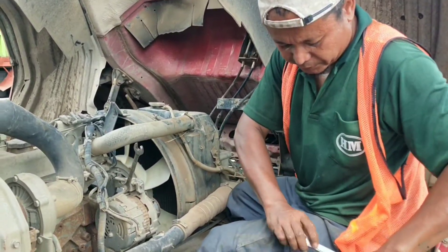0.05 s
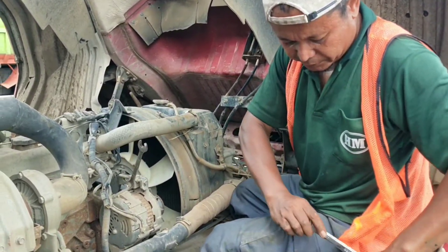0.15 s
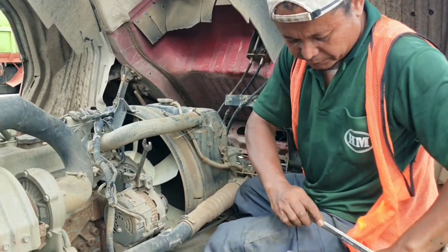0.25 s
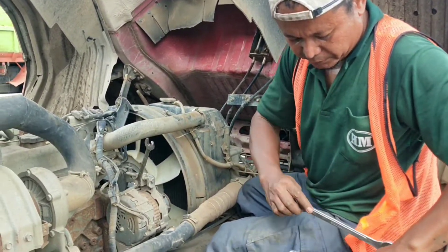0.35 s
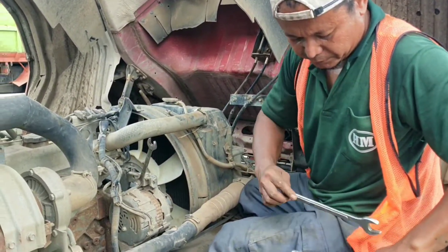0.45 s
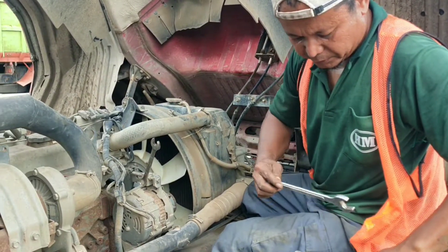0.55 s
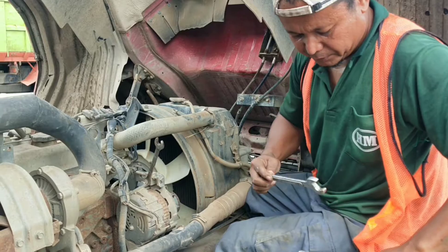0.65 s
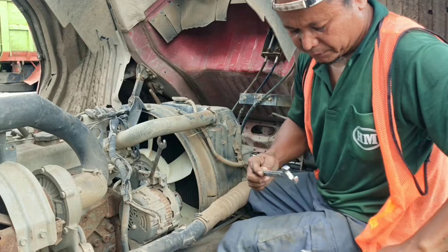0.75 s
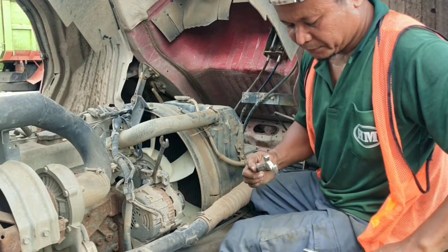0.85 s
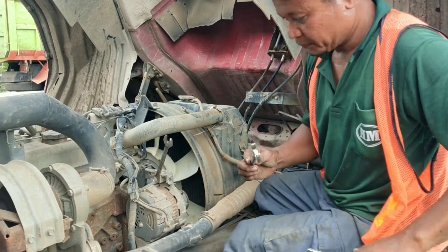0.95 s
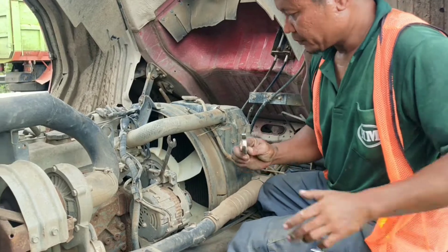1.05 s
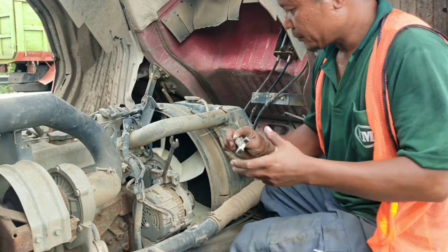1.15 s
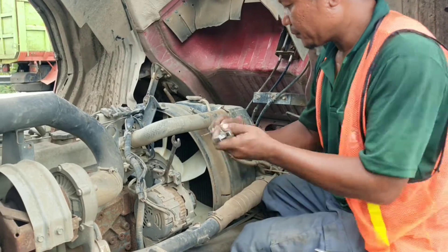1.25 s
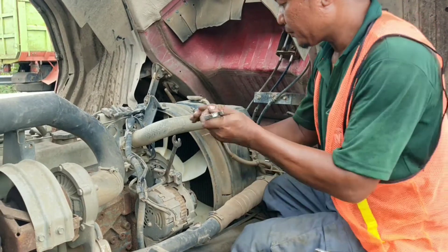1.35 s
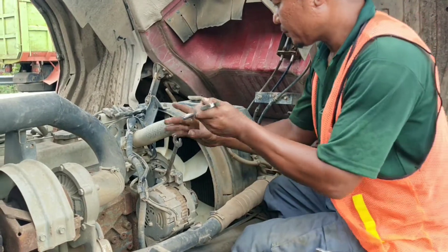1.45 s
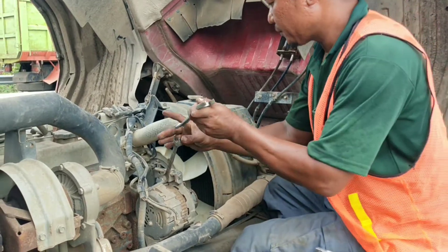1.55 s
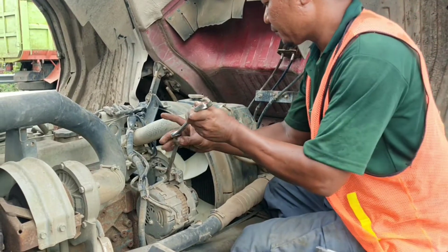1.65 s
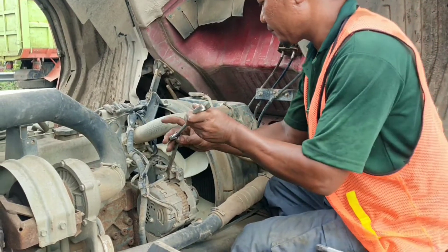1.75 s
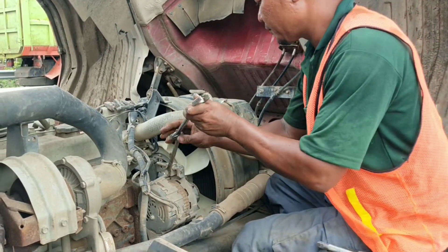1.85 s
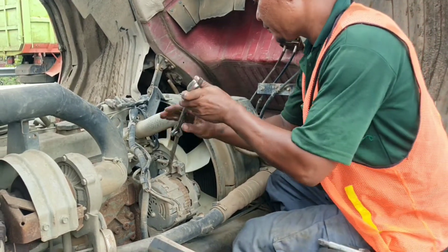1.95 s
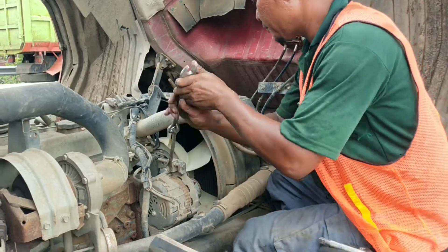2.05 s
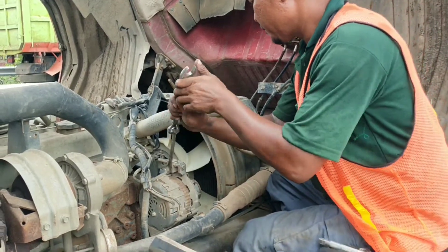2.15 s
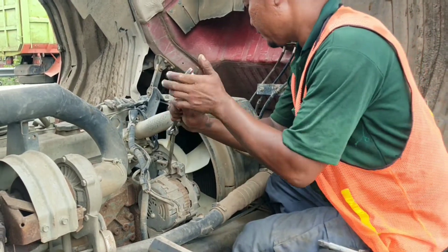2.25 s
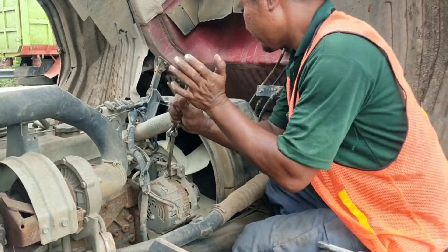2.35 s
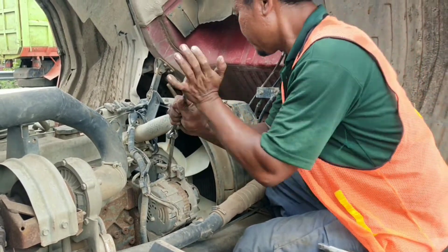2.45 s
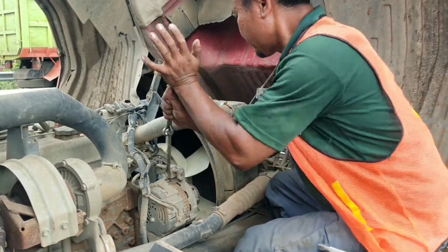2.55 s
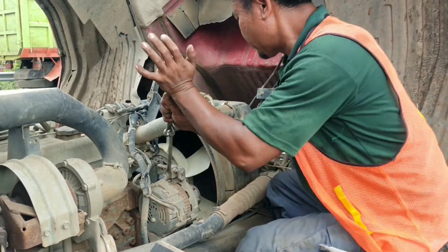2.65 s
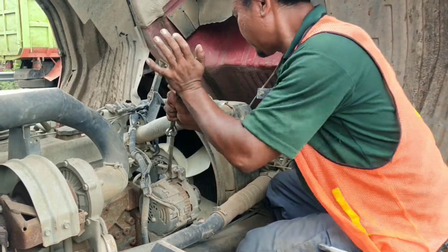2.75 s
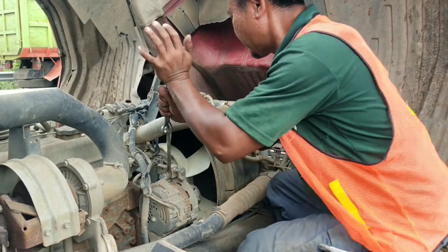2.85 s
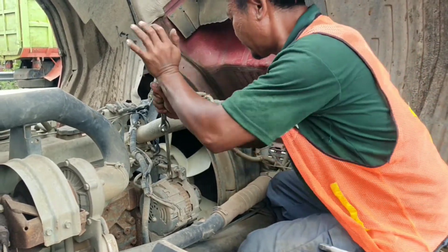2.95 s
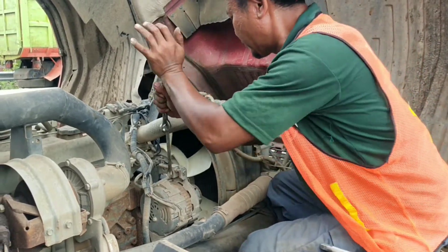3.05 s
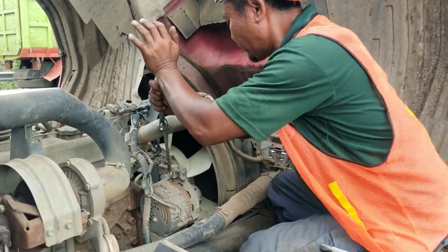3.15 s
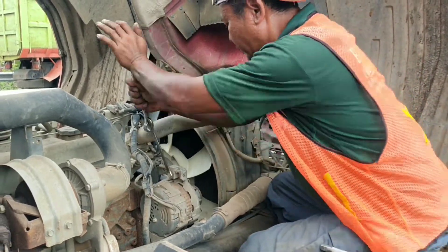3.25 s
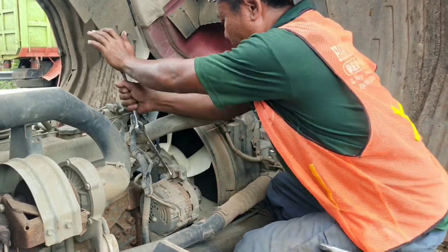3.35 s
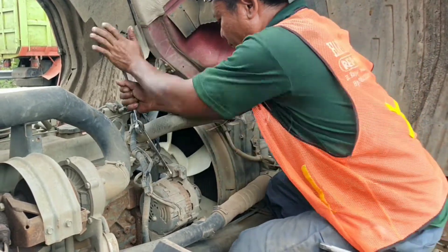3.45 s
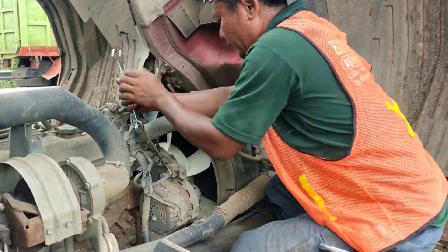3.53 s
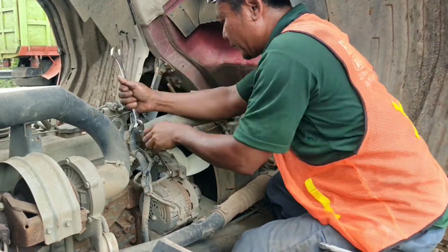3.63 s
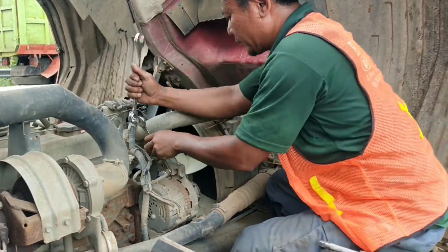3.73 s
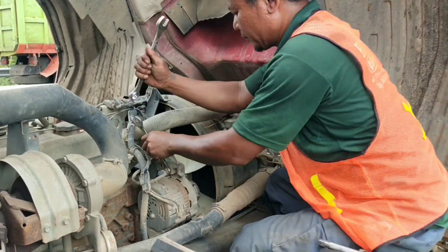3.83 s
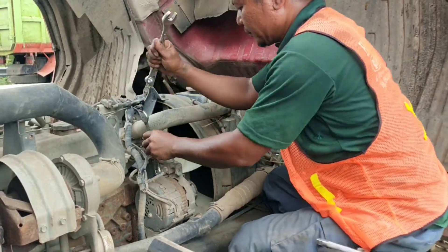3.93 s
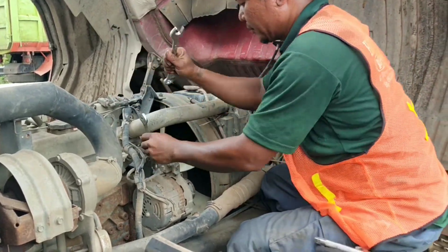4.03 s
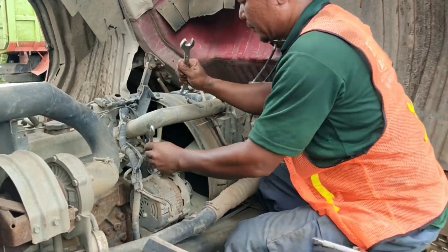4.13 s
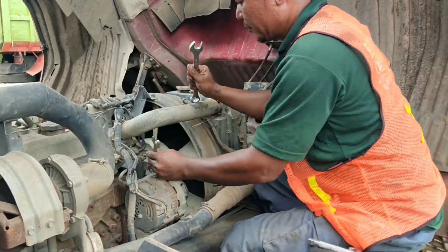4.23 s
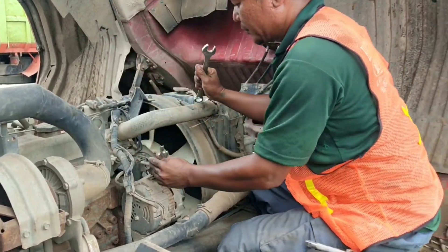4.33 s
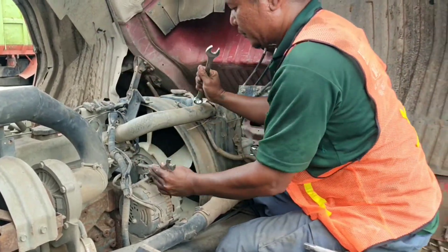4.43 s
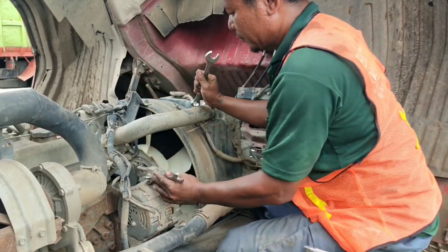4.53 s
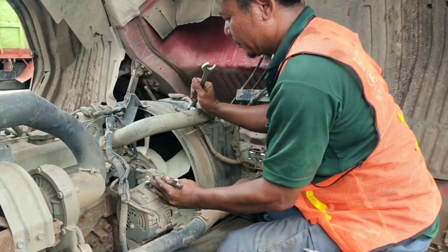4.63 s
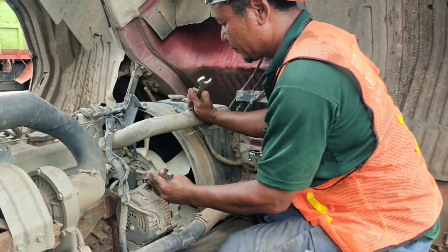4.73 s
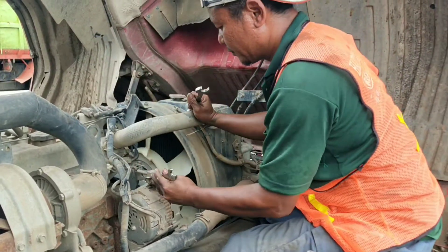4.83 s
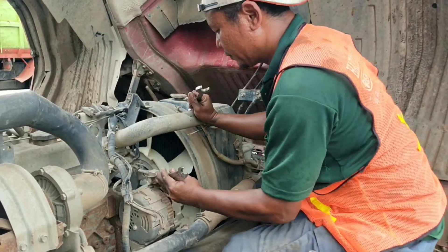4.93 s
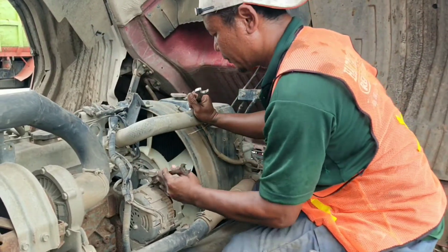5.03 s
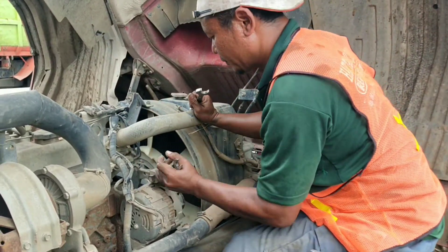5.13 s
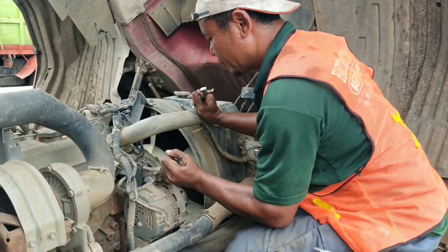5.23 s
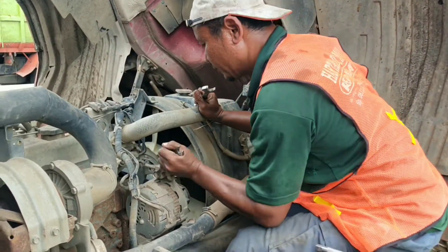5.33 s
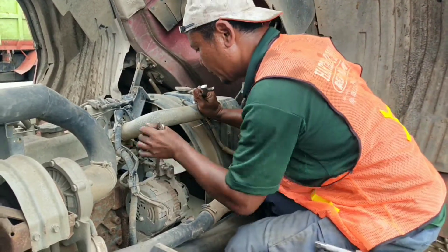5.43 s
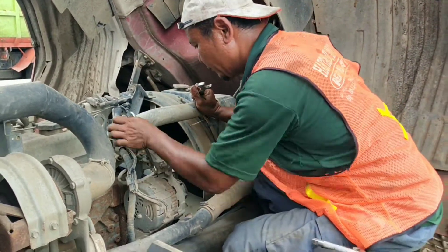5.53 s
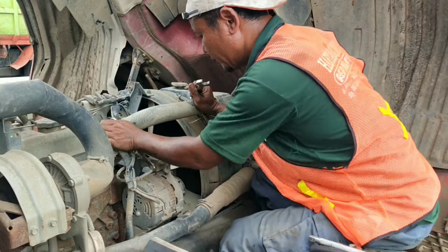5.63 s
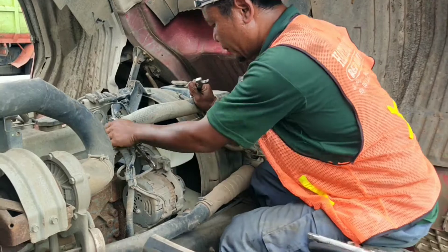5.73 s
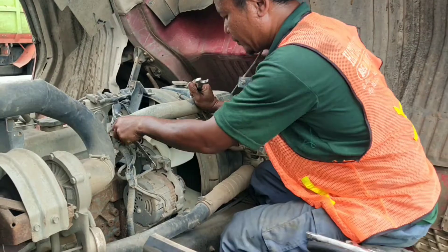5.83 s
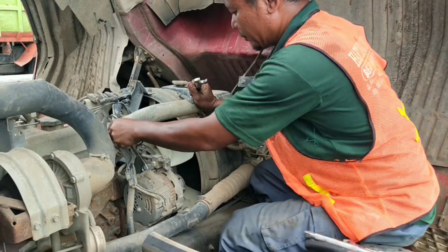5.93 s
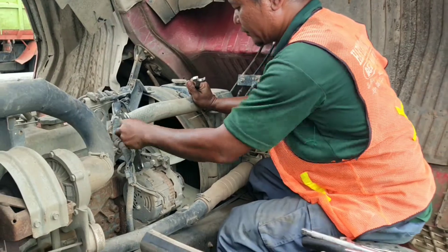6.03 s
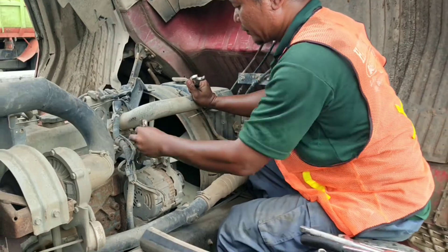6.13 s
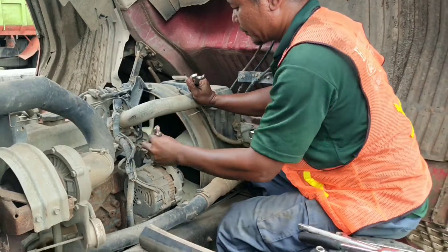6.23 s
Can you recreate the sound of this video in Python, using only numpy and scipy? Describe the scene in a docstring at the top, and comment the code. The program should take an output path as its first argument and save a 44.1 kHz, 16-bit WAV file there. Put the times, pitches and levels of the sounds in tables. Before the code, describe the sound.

Low rumble and a dull rush of far machinery run throughout, with a quiet engine note that repeatedly surges and sags, a soft hum and a thin wavering whine. At 0.5 s a faint tap and slight sliding rustle; at 0.8 s a spanner clinks brightly. A softer, longer clink rings from 1.36 s, with a dull tap at 1.6. Between 2.3 and 2.75 s come a tap and a flurry of small clicks and knocks as the jaw seats. A firm knock lands at 3.2 s, then at 3.56 s the loudest event, a hard steel crack with a short mount boom and cab echo. A faint pipe scrape spans 4.3-4.9 s, with a tap at 4.73. A strong click-knock hits at 5.46 s, another at 5.55, then soft taps and finger rasps fade by 6.2 s.

```python
"""Spanners on an engine bolt

A mechanic picks up two steel spanners, seats one on a bolt and strikes it with his palm until it cracks loose.
Clicks and block knocks are impact chatter through resonances; clinks and mount thuds are damped sines.
Taps are damped pushes; finger rasp, thread hiss and a scraped pipe are noise with uneven slips.
The tilted cab answers with decaying noise. Far machinery rumbles and rushes as noise, drones, hums and
whines as sines."""
import sys
import numpy as np
from scipy import signal
from scipy.fft import rfft, irfft, next_fast_len
from scipy.io import wavfile
from scipy.ndimage import map_coordinates

SR = 44100
rng = np.random.default_rng(int(sys.argv[2]) if len(sys.argv) > 2 else 0)


def digitize_waveform(pressure):
    """Quantize a signal to 16-bit integers and store it at the path in sys.argv[1].

    Rows of a 2-D input are taken as channels; values are limited to [-1, 1].
    """
    field = np.atleast_2d(pressure).T
    bounded = np.clip(field, -1, 1)
    quanta = np.round(bounded * 32767).astype(np.int16)
    wavfile.write(sys.argv[1], SR, quanta)


N = 276948

# Steel against bolt. Each row: start in seconds, click in dB, block knock in dB, chatter t60 in seconds.
BLOWS = [(0.799, -47.5, -59, 0.037), (1.3547, -59.5, -75, 0.056), (2.3343, -60, -51.5, 0.13),
         (2.3755, -60, -57, 0.11), (2.4372, -46, -42.5, 0.02), (2.502, -64, -53, 0.055),
         (2.635, -51, -47, 0.065), (2.733, -46.5, -52.5, 0.044), (3.195, -31, -29.5, 0.053),
         (3.4845, -63, -80.5, .098), (3.5566, -16, -24, 0.032), (4.3708, -63, -59.5, 0.089),
         (4.4077, -61, -48, 0.19), (4.922, -44, -51, 0.063), (5.4553, -37, -29.5, 0.036),
         (5.549, -52.5, -35.5, 0.025), (5.638, -57.5, -46, 0.04), (6.1845, -61.5, -73, 0.021)]
# Light touches of a loose jaw just before it bites. Each entry: start in seconds.
TOUCH_STARTS_S = [2.425, 2.616, 2.722, 3.182]
TOUCH_CLICK_DB, TOUCH_KNOCK_DB, TOUCH_CHATTER_S = -52.5, -52, 0.06
# Resonances of the jaw. Each row: centre in Hz, width in Hz, level in dB.
JAW_MODES = [(2860, 380, 0), (4000, 290, -4), (4384, 300, -8.5), (5640, 730, 4), (5800, 1100, -2.5),
             (11190, 290, -19), (14600, 640, -17.5)]
# Resonances of the engine block. Each row: centre in Hz, width in Hz, level in dB.
BLOCK_MODES = [(453, 45, -18.5), (661, 15, -3), (1017.5, 110, -4), (1290, 74, -0.5), (1550, 390, -6.5),
               (2144, 79, 8), (2656, 95, -7.5), (2800, 43, -6.5)]
# Spectrum of the jaw click. Each row: frequency in Hz, density in dB per Hz.
CLICK_SPECTRUM = [(800, -27.5), (2000, 9.5), (3500, -4.5), (5800, -1.5), (7500, -10.5), (10000, -20),
                  (15000, -21)]
# Spectrum of the block knock. Each row: frequency in Hz, density in dB per Hz.
KNOCK_SPECTRUM = [(60, -12), (160, -10), (350, -7.5), (700, 1), (1600, 2), (2600, -4.5), (4000, -24),
                  (8000, -48)]

# Heavy blows shake the bolt's mounting. Each row: start in seconds, level in dB.
THUDS = [(3.5572, -36.5), (5.4554, -36), (5.5506, -44.5)]
# Modes of the mounting. Each row: frequency in Hz, level in dB, t60 in seconds.
MOUNT_MODES = [(166, -7.5, 0.28), (227.4, -14, 1.7), (307, -3, 0.17), (350, -9.5, 0.69), (401.7, 0.5, 0.2),
               (459, 8, 0.053), (668, 2.5, 0.18), (758, -2, 0.24)]

# Free ringing of the tools. Each row: start in seconds, level in dB, which spanner, rise time constant
# in seconds, time until the hand stops it in seconds.
CLINKS = [(.15, -91.5, "short", 0.022, .4), (0.802, -53, "long", 0.00086, 0.27),
          (1.3557, -48, "short", 0.01, 0.87), (2.331, -61, "seated", 0.005, 0.047),
          (2.376, -53, "seated", 0.0021, 0.13), (2.4373, -45.5, "seated", 0.0014, 0.076),
          (3.4835, -53, "gripped", .002, 0.089), (4.404, -60, "seated", 0.0061, .06)]
# Long spanner, held loosely. Each row: frequency in Hz, level in dB, t60 in seconds.
LONG_MODES = [(1949, -17, .4), (3252, 0, .42), (3978, -3, .15), (5803, -7, .45), (6078, -11, .4),
              (8979, -22, .45), (12660, -20, .55), (13460, -21, .55), (14980, -17, .65)]
# Short spanner, held loosely. Each row: frequency in Hz, level in dB, t60 in seconds.
SHORT_MODES = [(2340, -21, 0.94), (2724, -27, 2.63), (4916, 6, 0.62), (6360, -28, 9.2), (8393, -10, 0.45),
               (10050, -26.5, 0.59), (12600, -34, .4), (14030, -34, 1.1)]
# Spanner seated on the bolt. Each row: frequency in Hz, level in dB, t60 in seconds.
SEATED_MODES = [(2540, 8.5, 0.13), (4400, 0, 0.084), (5070, -6, 0.1), (5590, -10.5, 0.07),
                (6650, 1.5, 0.065), (7960, -25, .15), (12860, -26, 0.16), (15500, -29, 0.13)]
# Spanner gripped in the fist. Each row: frequency in Hz, level in dB, t60 in seconds.
GRIPPED_MODES = [(2010, 1, 0.023), (2690, -2, 0.055), (4060, -11.5, 0.12), (4340, -8.5, 0.029),
                 (4980, -6, .08), (6147, -4, 0.24), (6705, -11, 0.02), (10700, -27, .08),
                 (10500, -26.5, .08), (14490, -18, 0.063)]
HAND_PORT_DB = 4  # a held spanner is nearer the left port: left raised, right lowered by this

# Dull taps of hand and tool. Each row: start in seconds, level in dB, centre in Hz.
TAPS = [(.497, -54.5, 700), (1.156, -49.5, 602.8), (1.339, -57, 680), (1.621, -42.5, 493),
        (1.672, -56.5, 685), (2.342, -40.5, 950), (4.729, -38.5, 850), (5.442, -35.5, 486.7),
        (5.698, -39.5, 380), (5.728, -44.5, 700), (5.751, -50, 810), (6.013, -54.5, 806)]

# Finger strokes at the bolt. Each row: start in seconds, length in seconds, skin rasp in dB, thread hiss in dB.
STROKES = [(0.576, 0.24, -76, -90), (0.818, .11, -64, -79.5), (2.947, .07, -74.5, -97.5),
           (3.819, .06, -76.5, -100), (5.068, 0.049, -64, -85), (5.164, 0.066, -60.5, -84),
           (5.248, 0.079, -82, -84), (5.409, 0.037, -48, -66.5), (5.561, 0.21, -66.5, -87.5),
           (5.796, 0.099, -63.5, -101), (5.901, 0.099, -78.5, -85), (6.008, 0.082, -64, -71),
           (6.101, 0.14, -65, -78)]
STROKE_ATTACK_S, STROKE_RELEASE_S = .02, 0.024
# Spectrum of the skin rasp. Each row: frequency in Hz, density in dB per Hz.
RASP_SPECTRUM = [(500, -16), (1050, 9), (1900, 8.5), (3200, -6), (4500, -29.5), (9000, -41.5)]
# Spectrum of the thread hiss. Each row: frequency in Hz, density in dB per Hz.
HISS_SPECTRUM = [(2000, -24), (4300, -14), (5450, -2), (6100, -18), (8000, -24.5), (15000, -31)]
# Gripped spanner sliding over cloth and skin. Each row: start in seconds, length in seconds, level in dB.
SLIDES = [(.01, .14, -88.5), (.46, 0.025, -78.5), (.54, 0.25, -77.5), (.85, 0.079, -67),
          (1.345, .05, -69.5), (1.61, 0.043, -91)]
SLIDE_ATTACK_S, SLIDE_RELEASE_S = 0.019, 0.034

# Scrape along the pipe. Each row: time in seconds, level in dB.
SCRAPE = [(4.12, -96.5), (4.28, -67), (4.451, -53.5), (4.6, -55), (4.781, -56.5), (4.881, -73.5),
          (4.98, -71)]
# Strength of the pipe's modes. Each row: frequency in Hz, level in dB.
PIPE_LEVELS = [(950, -4.5), (1300, 5.5), (1700, 0.5), (2550, -3), (3100, -7), (3330, -7.5), (3900, -21.5),
               (4900, -17), (7000, -31), (8400, -35), (9050, -22.5), (10500, -36.5), (15300, -39)]

# Decay of the cab. Each row: frequency in Hz, t60 in seconds.
CAB_DECAY = [(150, 0.33), (700, 0.46), (2000, 0.32), (6000, 0.26), (14000, .3)]

# Yard noise. Each row: time in seconds, rumble in dB, rush in dB.
YARD = [(0, -54, -55.5), (.35, -57.5, -61), (.8, -57.5, -57.5), (1.25, -56, -63), (2.25, -56.5, -61.5),
        (2.65, -54.5, -55), (3, -57.5, -63), (3.7, -57.5, -58), (4.1, -58.5, -70), (4.55, -56, -62),
        (5.3, -53, -59), (5.7, -52, -60), (6.05, -61, -64), (6.28, -62.5, -66.5)]
# Spectrum of the rumble. Each row: frequency in Hz, density in dB per Hz.
RUMBLE_SPECTRUM = [(15, -20.5), (35, -21), (55, 0.5), (80, -4), (140, -0.5), (200, -14), (400, -30.5),
                   (900, -73.5)]
# Spectrum of the rush. Each row: frequency in Hz, density in dB per Hz.
RUSH_SPECTRUM = [(100, -9), (220, 2.5), (380, 0.5), (620, -4.5), (780, -11), (1000, -22.5), (1500, -39.5),
                 (3000, -38.5), (6000, -45), (8000, -60), (15000, -62.5)]
# A far engine speeds up and sags. Each row: time in seconds, exhaust note in Hz.
DRONE_PITCH = [(0, 98.3), (.48, 95.95), (.76, 75.3), (.92, 97.1), (1.66, 99), (1.97, 76.1), (2.22, 75.6),
               (2.66, 97), (2.92, 97), (3.2, 74), (3.6, 101.5), (3.98, 100.5), (4.2, 75), (4.48, 95),
               (4.78, 101), (5.14, 74), (5.6, 85.3), (6.28, 77.6)]
DRONE_DB = -60.5
# Now and then its note booms. Each row: start in seconds, length in seconds, level in dB.
BOOMS = [(.52, 0.074, -42), (.72, 0.14, -54), (1.71, 0.058, -42.5), (1.9, 0.062, -53), (2.61, .1, -50.5),
         (2.96, .07, -52.5), (3.17, .25, -55), (4.17, 0.062, -54.5), (4.46, 0.16, -51), (5.05, 0.2, -55.5)]
BOOM_ATTACK_S, BOOM_RELEASE_S = 0.039, .05
# A steadier hum. Each row: time in seconds, pitch in Hz, level in dB.
HUM = [(2.2, 121.2, -73), (2.5, 119, -58), (3.6, 113.2, -56.5), (4.2, 106.2, -63), (5.7, 106.7, -59.5),
       (6.28, 107.8, -71.5)]
# A wavering whine. Each row: time in seconds, pitch in Hz, level in dB.
WHINE = [(0, 520, -65), (1.3, 530, -67), (2.3, 552, -67), (3, 588, -63), (4.2, 580, -67), (4.7, 595, -58),
         (5.3, 592, -62), (5.8, 577, -69), (6.28, 565, -79)]

# The right port is muffled. Each row: frequency in Hz, left minus right in dB.
PORT_DIFFERENCE = [(100, -2), (300, -1.5), (700, -4.5), (1400, -0.5), (2600, 0.5), (3500, 5), (5600, 16.5),
                   (8000, 13), (15000, 12)]
TOP_HZ = 15850


def blows():
    """The jaw clicks on the bolt head and the block knocks beneath it."""
    out, t = np.zeros((2, N)), np.arange(SR // 3) / SR
    touches = [(s, TOUCH_CLICK_DB, TOUCH_KNOCK_DB, TOUCH_CHATTER_S) for s in TOUCH_STARTS_S]
    for start_s, click_db, knock_db, chatter_s in BLOWS + touches:
        click = contact(t, chatter_s, JAW_MODES, CLICK_SPECTRUM, ring_db=7.5,
                        parts_db=1.5, parts_t60=0.053, scatter_db=-4.0, scatter_t60=0.087)
        knock = contact(t, chatter_s, BLOCK_MODES, KNOCK_SPECTRUM, ring_db=10,
                        parts_db=3.0, parts_t60=.12, scatter_db=3.0, scatter_t60=0.16)
        add(out, start_s, amp(click_db) * click + amp(knock_db) * knock)
    return placed(out, lead_ms=0.23)


def contact(t, chatter_s, modes, spectrum, ring_db, parts_db, parts_t60, scatter_db, scatter_t60):
    """Chattering impacts ring the modes; nearby metal scatters the sound. Rms 1 over the first 10 ms."""
    build_up = 1 - np.exp(-(t + 1 / SR) / (0.54 * chatter_s ** 2))  # long, loose chatter starts softly
    spikes = rng.standard_normal(len(t)) ** 3 * amp(-60 * t / chatter_s) * build_up
    force = spikes / np.linalg.norm(spikes) + 0.15 * (t == 0)
    ring = filtered(force[None], resonances(modes))
    rattle = signal.fftconvolve(force, brackets(t, parts_t60))[None, :len(t)]
    parts = coloured(rattle, spectrum)
    direct = unit(coloured(force[None], spectrum)) + amp(ring_db) * unit(ring) + amp(parts_db) * unit(parts)
    scatter_gain = amp(-60 * t / scatter_t60) * (1 - np.exp(-t / 0.0033))
    scatter = coloured(pair(len(t), apart=2.3) * scatter_gain, spectrum)
    sound = unit(direct) + amp(scatter_db) * unit(scatter)
    return sound / np.sqrt(np.mean(sound[:, :SR // 100] ** 2))


def brackets(t, t60, count=36):
    """Small parts near the contact ring briefly, a new handful each time."""
    hz = np.geomspace(500, 15000, count) * np.exp(rng.normal(0, .04, count))
    level_db = rng.normal(0, 3.0, count) + 10 * np.log10(hz / hz[0])
    part_t60 = t60 * np.exp(rng.normal(0, 0.23, count))
    return ringing_modes(t, zip(hz, level_db, part_t60))


def thuds():
    """The mounting takes a few milliseconds to swing, then booms briefly."""
    out, t = np.zeros((2, N)), np.arange(SR) / SR
    for start_s, db in THUDS:
        swing = 1 - np.exp(-t / 0.0042)
        add(out, start_s, amp(db) * swing * ringing_modes(t, MOUNT_MODES)[None])
    return placed(out, lead_ms=.2)


def clinks():
    """Struck spanners ring on in their bending modes until the hand damps them."""
    out, t = np.zeros((2, N)), np.arange(2 * SR) / SR
    modes = {"long": LONG_MODES, "short": SHORT_MODES, "seated": SEATED_MODES, "gripped": GRIPPED_MODES}
    for start_s, db, tool, rise_s, held_s in CLINKS:
        free = (1 - np.exp(-t / rise_s)) * np.exp(-np.maximum(t - held_s, 0) / .02)
        add(out, start_s, amp(db) * free * ringing_modes(t, modes[tool])[None])
    wavering = out * amp(1.2 * wobble(45))  # as the hand moves
    return in_hand(placed(wavering, lead_ms=0.26))


def ringing_modes(t, modes):
    """Damped sines, at slightly new strengths each time."""
    return sum(amp(db + rng.normal(0, 1) - 60 * t / t60) * np.sin(2 * np.pi * hz * t) for hz, db, t60 in modes)


def in_hand(x):
    """A held spanner lies to the left."""
    return x * amp(HAND_PORT_DB * np.array([[1], [-1]]))


def taps():
    """Soft contacts give one damped push with no ring."""
    out, t = np.zeros((2, N)), np.arange(SR // 10) / SR
    for start_s, db, hz in TAPS:
        force = (t == 0) + 0.07 * rng.standard_normal(len(t)) * amp(-60 * t / 0.055)
        damped = resonances([(hz, 1.47 * hz, 0)])
        push = filtered(force, lambda f: damped(f) ** 4)
        add(out, start_s, amp(db) * push[None] / np.abs(push).max())
    return out * amp([[-2], [2]])  # towards the right


def rubbing():
    """Sliding steel sings in the gripped spanner's modes; fingers rasp and the bolt hisses in its thread."""
    sliding = swells(SLIDES, SLIDE_ATTACK_S, SLIDE_RELEASE_S)
    skin = swells([(s, length, db) for s, length, db, _ in STROKES], STROKE_ATTACK_S, STROKE_RELEASE_S)
    thread = swells([(s, length, db) for s, length, _, db in STROKES], STROKE_ATTACK_S, STROKE_RELEASE_S)
    sing = in_hand(sliding * singing([(hz, 70 + hz / 40, db) for hz, db, _ in GRIPPED_MODES]))
    hiss = thread * slips() * noise(HISS_SPECTRUM, apart=0.96)
    rasp = skin * slips() * noise(RASP_SPECTRUM, apart=1.0)
    return placed(sing + hiss + rasp, lead_ms=0.37)


def pipe(count=42):
    """A scraped pipe sings in bending modes and, higher up, in dense modes that squash its wall oval."""
    k = np.arange(count)
    bending_hz = (960 + 328 * k + 19 * k ** 2)[:count // 4]
    oval_hz = np.hypot(3280, 283 + 269 * k + 2.2 * k ** 2)
    modes = [(hz, 44 + hz / 300, along(PIPE_LEVELS, hz)) for hz in np.r_[bending_hz, oval_hz]]
    tones = singing(modes, catch=0.37)
    s, db = np.transpose(SCRAPE)
    pressure = amp(np.interp(np.arange(N) / SR, s, db, left=-np.inf, right=-np.inf))
    return placed(pressure * tones, lead_ms=0.492)


def singing(modes, catch=1.0, size=16384):
    """Friction sounds narrow (Hz, width, dB) modes; less catch is a smoother slide. Rms 1."""
    grid = np.fft.rfftfreq(size, 1 / SR)
    gain = sum(amp(db) / (1 + (2 * (grid - hz) / width) ** 2) for hz, width, db in modes)
    friction = slips() ** catch * pair(N, apart=0.89)
    return unit(filtered(friction, lambda f: np.interp(f, grid, gain)))


def slips():
    """Friction comes in uneven small catches."""
    return unit(amp(2.5 * wobble(45) + 3.5 * wobble(300)))


def cab(x):
    """The cab and yard walls answer with a noise tail that decays at a rate set by frequency."""
    _, t, z = signal.stft(rng.standard_normal((2, SR * 3 // 4)), SR, nperseg=256)
    decay = amp(-60 * t / along(CAB_DECAY, np.fft.rfftfreq(256, 1 / SR))[:, None])
    tail = signal.istft(z * decay, SR, nperseg=256)[1]
    tail *= 1 - np.exp(-np.arange(tail.shape[1]) / SR / 0.0033)
    return signal.fftconvolve(x, tail / np.linalg.norm(tail[0]), axes=1)[:, :N]


def yard():
    """Far machinery: rumble, a dull rush, a surging exhaust note, a low hum and a wavering whine."""
    rumble_db, rush_db = curves(YARD)
    rumble = amp(rumble_db + 0.73 * wobble(9.1)) * noise(RUMBLE_SPECTRUM, apart=0.39)
    rush = amp(rush_db + 1.3 * wobble(6.9)) * noise(RUSH_SPECTRUM, apart=0.94)
    note_hz, = curves(DRONE_PITCH)
    load = amp(DRONE_DB + 3.1 * wobble(6.3)) + swells(BOOMS, BOOM_ATTACK_S, BOOM_RELEASE_S)
    exhaust = load * tone(note_hz + 2 * wobble(25))
    hum_hz, hum_db = curves(HUM)
    hum = amp(hum_db + 0.79 * wobble(6.4)) * tone(hum_hz + wobble(25))
    whine_hz, whine_db = curves(WHINE)
    whine = amp(whine_db + 2.5 * wobble(14)) * tone(whine_hz + 9 * wobble(40))
    return placed(rumble + rush + exhaust + hum + whine, lead_ms=0.13)


def amp(db):
    """Decibels to gain."""
    return 10 ** (np.asarray(db) / 20)


def unit(x):
    """Scale to rms 1."""
    return x / np.sqrt(np.mean(x ** 2) + 1e-20)


def along(points, hz):
    """Interpolate (Hz, value) points on a log axis."""
    f, v = np.transpose(points)
    return np.interp(np.log(hz + 1), np.log(f + 1), v)


def curves(rows):
    """One value per sample for each column after the time."""
    s, *cols = np.transpose(rows)
    return [np.interp(np.arange(N) / SR, s, c) for c in cols]


def wobble(rate_hz):
    """A smooth random curve, rate_hz knots a second."""
    knots = rng.standard_normal(int(N * rate_hz / SR) + 4)
    return map_coordinates(knots, [np.arange(N) * rate_hz / SR])


def swells(rows, attack_s, release_s):
    """Summed gain of (start s, length s, dB) events: each rises, holds and dies away."""
    t = np.arange(N) / SR
    gain = 0
    for start_s, length_s, db in rows:
        rise = np.clip((t - start_s) / attack_s, 0, 1)
        gain = gain + amp(db) * rise * np.exp(-np.maximum(t - start_s - length_s, 0) / release_s)
    return gain


def tone(hz):
    """A sine that follows a pitch curve."""
    return np.sin(2 * np.pi * np.cumsum(hz) / SR)


def filtered(x, response):
    """x times a complex response of frequency."""
    n = x.shape[-1]
    m = next_fast_len(n + SR // 4)
    return irfft(rfft(x, m) * response(np.fft.rfftfreq(m, 1 / SR)), m)[..., :n]


def resonances(modes):
    """Causal response of (Hz, width, dB) modes, with alternating signs."""
    return lambda f: sum((-1) ** k * amp(db) * 1j * f * w / (c * c - f * f + 1j * f * w)
                         for k, (c, w, db) in enumerate(modes))


def coloured(x, spectrum, size=2048):
    """x through the causal minimum-phase filter that has this spectrum."""
    cepstrum = irfft(np.log(amp(along(spectrum, np.fft.rfftfreq(size, 1 / SR)))))
    cepstrum[1:size // 2] *= 2
    cepstrum[size // 2 + 1:] = 0
    impulse = irfft(np.exp(rfft(cepstrum)))
    return signal.fftconvolve(x, impulse[None], axes=1)[:, :x.shape[1]]


def pair(n, apart):
    """White noise at two ports; apart is its unshared part."""
    return rng.standard_normal(n) + apart * rng.standard_normal((2, n))


def noise(spectrum, apart):
    """Steady stereo noise of rms 1."""
    return unit(coloured(pair(N, apart), spectrum))


def placed(x, lead_ms):
    """A source on the left reaches the left port first."""
    side = np.array([[1], [-1]])
    return filtered(x, lambda f: np.exp(1j * np.pi * f * side * lead_ms * 10 ** -3))


def add(track, start_s, sound):
    """Mix a sound into the track."""
    part = track[:, max(0, round(start_s * SR)):][:, :sound.shape[1]]
    part += sound[:, :part.shape[1]]


def scene():
    """Work at the bolt and ringing tools, their echo in the cab, the pipe and the yard."""
    work = blows() + thuds() + taps() + rubbing()
    ringing = clinks()
    echo = cab(amp(-15) * work + amp(-16.5) * ringing)
    return work + ringing + echo + pipe() + yard()


def record(dry):
    """Two unequal microphone ports, a soft ceiling and a steep band limit."""
    side = np.array([[1], [-1]])
    heard = filtered(dry, lambda hz: amp(side * along(PORT_DIFFERENCE, hz) / 2))
    heard = heard / (1 + np.abs(heard / .9) ** 6) ** (1 / 6)
    return filtered(heard, lambda hz: 1 / (1 + (hz / TOP_HZ) ** 160))


dry = scene()
out = record(dry)
digitize_waveform(out)
```